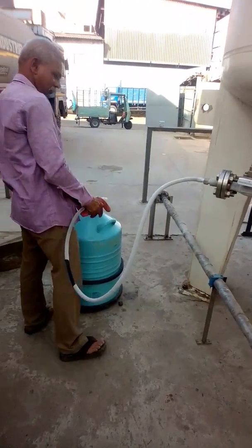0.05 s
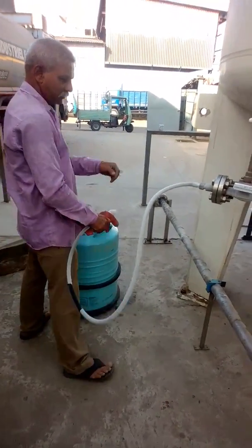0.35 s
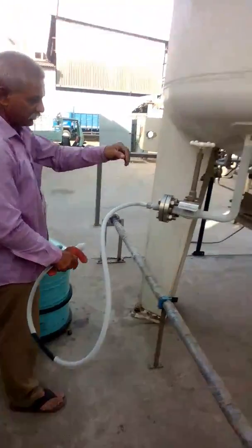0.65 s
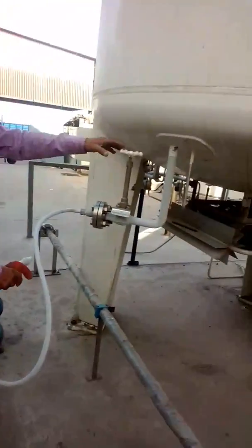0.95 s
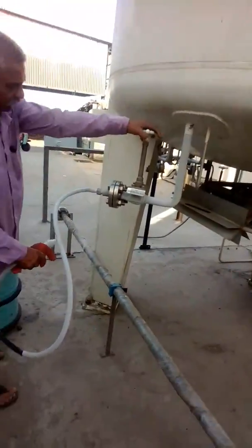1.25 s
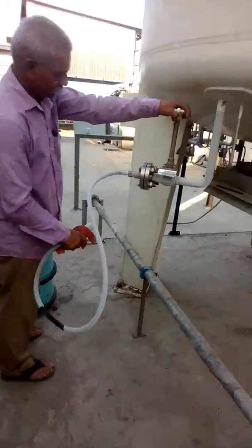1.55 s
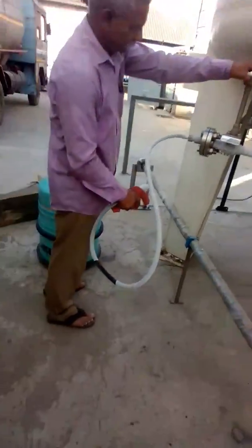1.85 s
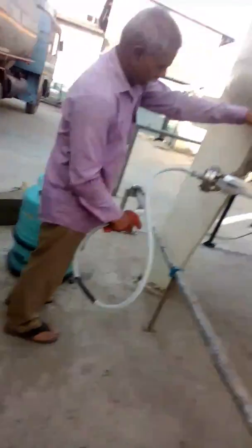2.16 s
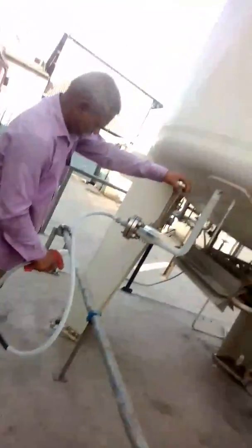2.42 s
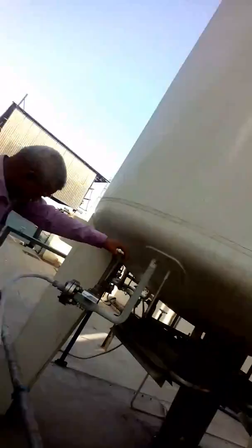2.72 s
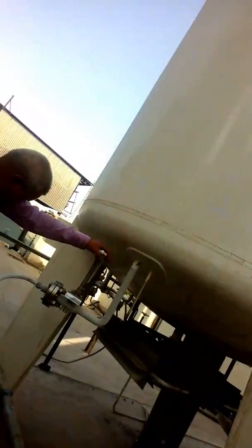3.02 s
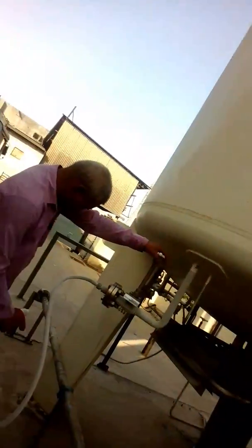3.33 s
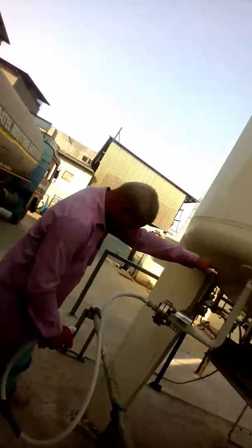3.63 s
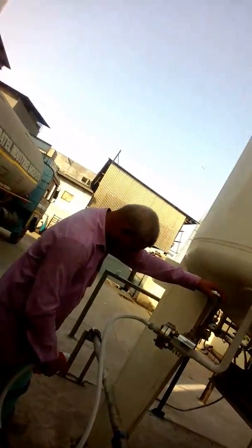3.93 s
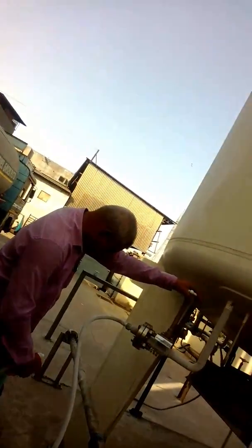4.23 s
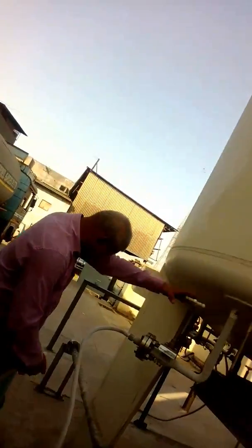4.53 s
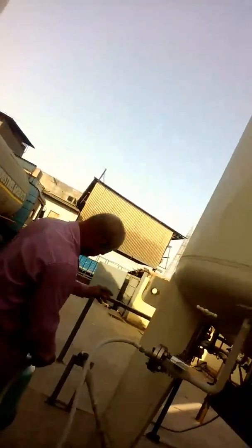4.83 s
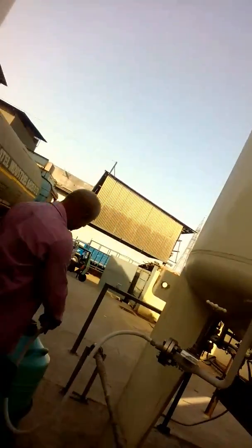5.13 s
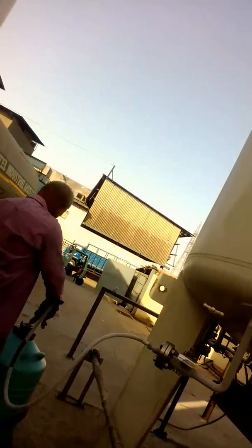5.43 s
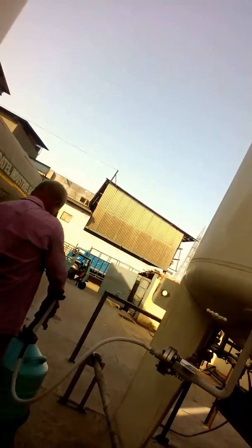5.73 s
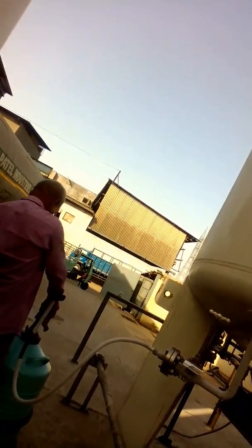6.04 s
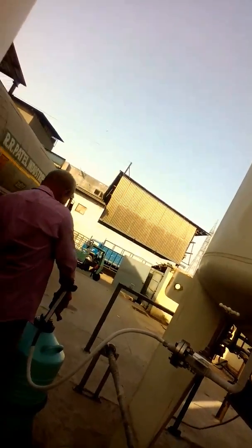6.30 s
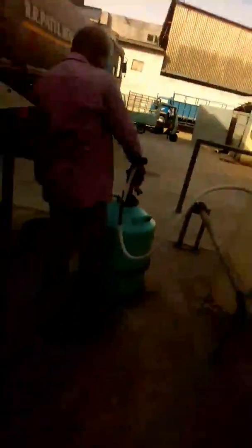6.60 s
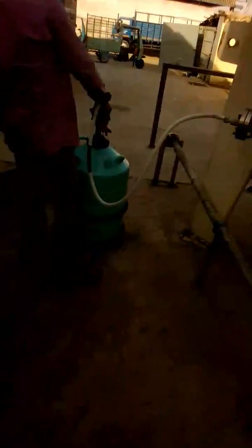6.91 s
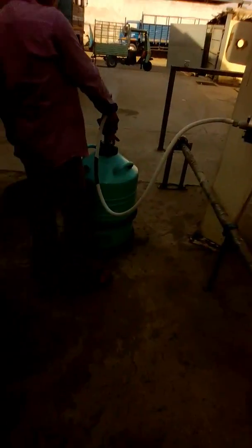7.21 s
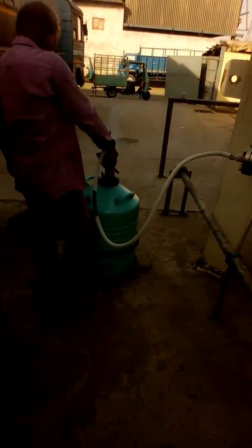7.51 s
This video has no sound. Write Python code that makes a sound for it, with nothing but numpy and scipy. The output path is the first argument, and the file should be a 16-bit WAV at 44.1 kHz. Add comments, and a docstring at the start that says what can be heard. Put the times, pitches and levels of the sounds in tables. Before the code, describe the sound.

Pressurised gas hisses loudly and continuously from a storage tank through a hose in an open yard. Rough, wavering tones ring within the rush, and a thin, very high whistle slowly climbs. After about five seconds the jet reaches the mouth of a flask and howls hollowly. The nozzle goes down the neck with one small dull knock while the hiss carries on, picked up by a hand-held microphone.

```python
"""A jet of cold pressurised gas and liquid hisses from a storage tank through a hose, in an open yard.
Turbulence drives the resonances of the gas path: the jet first hisses into the air as the valve opens,
then the hose rings with rough tones and the valve's thin whistle climbs. Brought to the mouth of a flask,
the jet makes it howl hollowly, and the nozzle goes down the neck with a dull knock.
Ground and tank wall reflect the hiss to a hand-held microphone."""
import sys
import numpy as np
from scipy import signal
from scipy.io import wavfile

SR = 44100
rng = np.random.default_rng(int(sys.argv[2]) if len(sys.argv) > 2 else 0)


def persist_wave(psi):
    """Save psi, clipped to +-1, as 16-bit WAV."""
    counts = np.round(np.clip(psi, -1, 1) * 32767).astype(np.int16)
    wavfile.write(sys.argv[1], SR, np.atleast_2d(counts).T)


N = 342216
FRAME, HOP = 4096, 1024
TIME = np.arange(N) / SR
FRAME_TIMES = np.arange(N // HOP + 2) * HOP / SR
FREQS = np.maximum(np.fft.rfftfreq(FRAME, 1 / SR), 1)

# The mix in each stage (gas, spray, hose flooded, hose ringing, flow settled, flask mouth, flask neck):
# roar_db, rush_db, hiss_db, whistle_db, whistle_breath_db
STAGE_LEVELS = [(-36.5, -19, -11.5, -25, -25), (-34, -21.5, -11.5, -25, -31),
                (-40.5, -21.5, -15.5, -28, -28), (-40.5, -19.5, -14, -28, -30.5),
                (-40.5, -21.5, -14, -27, -30), (-32.5, -15.5, -17, -35, -41),
                (-32.5, -18.5, -15.5, -34.5, -43)]
# Crossfades into each stage after the first, holding their end values: time_s, share (0-1)
FADE_TO_SPRAY = [(1.1, 0.04), (1.5, 1)]
FADE_TO_FLOODED = [(1.95, 0.015), (2.2, 0.55), (2.6, 0.68)]
FADE_TO_RINGING = [(3.25, 0), (3.6, 0.88)]
FADE_TO_SETTLED = [(4.45, 0.032), (4.9, 0.93)]
FADE_TO_MOUTH = [(5.3, 0), (5.45, 0.15), (5.62, 0.26), (5.76, 1)]
FADE_TO_NECK = [(6.52, 0.12), (6.66, 0.44), (6.95, 0.92)]
# The flow spurts or falters: centre_s, length_s, hiss_change_db
SPURTS = [(0.205, 0.041, 1), (0.272, 0.044, -2), (0.37, 0.049, 2), (.52, 0.14, 1.5), (0.661, 0.044, -2),
          (1.008, 0.049, -0.7), (1.1, 0.046, 2.5), (1.356, 0.32, 1.5), (1.98, 0.1, 1.4), (2.902, .12, 0.5),
          (3.29, 0.089, 0.5), (4.47, .1, 0.5), (5.1, .12, 1.5), (6.965, 0.09, 1.5), (7.313, .06, 0.5),
          (7.41, 0.069, 0.5)]
# Last turn of the valve, nozzle swung over, jet grazing the rim, push down the neck:
# start_s, end_s, ramp_s, roar_change_db, rush_change_db, hiss_change_db
HANDLING = [(4.4, 4.78, .1, 1.5, 0, 0.5), (5.24, 5.46, 0.11, -.5, 0, -1.3),
            (5.484, 5.6, 0.068, 4.5, 2.5, -.5), (6.596, 6.966, 0.055, 1, -2, 0.9)]
# The nozzle rests on the flask's mouth: one row, columns as in HANDLING
NOZZLE_SEATED = (6.08, 6.6, .05, 1.7, -2.5, -1.9)

# Broad tone colours of the jet: frequency_hz, relative_level_db
GAS_COLOUR = [(30, -32), (100, -26), (180, -17.5), (300, -5.5), (520, -0.5), (1400, -0.5), (3200, 2.5),
              (5300, 4.5), (6200, 5.5), (7800, 10.5), (11500, 6), (14200, 1.5), (16500, 0)]
SPRAY_COLOUR = [(30, -31), (100, -27), (190, -6.5), (320, 0.5), (650, 0), (1100, 4), (2000, 0), (4900, 3),
                (6500, 8), (9000, 10.5), (10800, 6), (12800, 5), (14200, -1), (16500, 0)]
LIQUID_COLOUR = [(30, -42), (100, -21), (200, -18), (290, -8), (680, -3), (1100, 2.5), (2000, 1.5),
                 (5300, 1), (6500, 5), (8800, 4), (11500, 5), (13900, 3), (14800, -1), (16500, -7)]
FLASK_COLOUR = [(30, -42), (100, -22), (200, -14.5), (330, -2.5), (620, -0.5), (1100, -2), (2200, -2),
                (4500, 0.5), (8700, 0.5), (11000, 3), (12400, -1), (13200, -1), (14400, -3.5), (16500, -19)]
# Resonances of nozzle, hose and flask, by stage: pitch_hz, width_hz, level_over_colour_db
GAS_MODES = [(850, 60, -8), (1860, 560, 4.5), (2480, 210, 6), (3650, 84, 4), (4160, 150, 0),
             (4600, 233, -6), (7200, 810, 1), (9500, 600, 1.5)]
SPRAY_MODES = [(840, 150, 3.5), (2593, 300, -16), (3660, 170, 3.5), (7150, 400, -7), (8900, 800, -3),
               (9700, 300, 2)]
FLOODED_MODES = [(870, 110, 10), (1120, 180, 2.5), (1400, 80, 0), (1600, 130, 4), (2550, 150, 7),
                 (3240, 70, 8.5), (3850, 70, 5), (4300, 120, -2), (6120, 160, -6), (6800, 200, -1),
                 (7270, 300, 7), (8000, 300, 5.5), (8900, 400, -7), (9500, 250, -7), (10250, 250, 1),
                 (10900, 350, 3)]
RINGING_MODES = [(900, 92, 9), (1180, 140, 1.5), (1550, 80, 5.5), (2600, 140, 7), (3300, 160, 3),
                 (3910, 140, 3), (4635, 120, 5), (5230, 200, -2.5), (5800, 140, -1), (6380, 300, 3),
                 (6830, 200, 6), (7200, 80, 7.5), (7590, 250, 7), (9500, 340, 4), (10400, 350, 3),
                 (11000, 330, 5), (12100, 121, -1)]
SETTLED_MODES = [(935, 97, 3), (1200, 330, 3), (1600, 230, 1.5), (2570, 80, 5.5), (3320, 180, 7),
                 (3990, 160, 4), (4700, 200, 1), (5250, 120, 5), (6240, 200, -3), (6960, 170, 5),
                 (7580, 250, 6), (8300, 400, 3.5), (9100, 200, 0), (9620, 200, 5.5), (10440, 360, 6),
                 (11200, 250, 6.5)]
MOUTH_MODES = [(520, 160, 2.5), (748, 33, 13), (857, 42, 16.5), (972, 55, 10), (1104, 19, 19.5),
               (1156, 34, 13), (1213, 77, 9.5), (1465, 73, 9), (1560, 40, 16.5), (1729, 13, 18),
               (1910, 35, 3.5), (2046, 45, 8.5), (2400, 65, 8), (2590, 30, 14.5), (3250, 110, 4),
               (3490, 120, 10.5), (3910, 36, 6), (4140, 200, 1.5), (4390, 70, 3), (4950, 150, 2),
               (7700, 300, -8), (10000, 300, -6)]
NECK_MODES = [(535, 170, 6), (733, 47, 8), (860, 75, 9), (1040, 100, -6), (1675, 44, 9.5), (1887, 52, 7.5),
              (2400, 16, 14), (2504, 23, 11), (2600, 23, 13), (2718, 25, 13), (3110, 39, 8),
              (3410, 120, 8.5), (3643, 62, 4), (3770, 40, 5), (4240, 37, 3), (4700, 61, 3.5),
              (5550, 150, 5.5), (6250, 260, 4.5), (7230, 510, 3.5), (7790, 140, 5), (9300, 200, 1),
              (10320, 200, 3)]
# Antiresonances that hollow out the gas path, by stage: centre_hz, width_hz, gain_db
GAS_NOTCHES = [(770, 140, -8), (5330, 700, -2)]
FLOODED_NOTCHES = [(5400, 1100, -1)]
RINGING_NOTCHES = [(420, 130, -5), (686, 110, -3), (1900, 200, -2.2), (8900, 1500, -0.5)]
SETTLED_NOTCHES = [(1930, 500, -3.5), (745, 110, -8)]
MOUTH_NOTCHES = [(620, 51, -6), (2220, 130, -1)]
NECK_NOTCHES = [(626, 53, -4), (1330, 320, -1.5), (2180, 260, -2)]
# The rim shades the hiss of the seated nozzle: centre_hz, width_hz, gain_db
RIM_NOTCH = [(6200, 3200, -2.5)]
# The jet catches an edge and a band of hiss swells: start_s, end_s, centre_hz, width_hz, gain_db
SQUEALS = [(-.1, .45, 3620, 110, 5), (.66, 1.02, 3640, 110, 7), (.15, .27, 9870, 250, 7),
           (.98, 1.42, 4750, 300, 6), (.29, .62, 7400, 900, 4), (.7, 1.45, 950, 400, 3.5),
           (.8, 1.45, 1600, 200, 2), (1.253, 1.72, 8300, 1200, 3), (1.5, 1.95, 6100, 500, 1),
           (1.89, 2.1, 9400, 1200, 2), (2.14, 2.32, 7700, 900, 2), (2.5, 2.62, 9250, 300, 5),
           (2.7, 2.97, 5900, 700, 4.5), (2.85, 2.98, 7380, 400, 4.5), (3.1, 3.45, 6700, 1000, 3),
           (2.95, 4.15, 14250, 350, 3), (4.6, 5.45, 14480, 300, 5), (3.38, 4.6, 1520, 220, 2),
           (4.45, 4.68, 6200, 400, 5), (4.45, 4.58, 9700, 250, 5), (5.0, 5.17, 10450, 548, 5.5),
           (5.1, 5.26, 7000, 400, 4), (5.75, 6.6, 3430, 330, 2), (6.58, 6.87, 5350, 900, 4.5),
           (6.58, 6.75, 7500, 2600, 2.5), (6.6, 6.8, 3400, 200, 8), (6.72, 6.98, 6150, 350, 3.5),
           (6.898, 7.038, 7870, 420, 10), (6.857, 7.38, 4330, 130, 2), (6.98, 7.42, 3620, 400, 4.5),
           (7.46, 7.72, 4780, 300, 5), (7.35, 7.9, 1920, 450, 4), (7.4, 7.9, 2703, 260, 4.5)]
# The flask's air howls as the jet nears and enters it: start_s, end_s, centre_hz, width_hz, gain_db
HOWLS = [(5.32, 5.62, 940, 150, 5.5), (5.7, 6.2, 360, 110, 4.5), (5.387, 5.678, 1600, 1000, 4.5),
         (5.6, 6.83, 940, 650, 3)]
# Bands thin out as nozzle and microphone move: start_s, end_s, centre_hz, width_hz, gain_db
SHADES = [(-0.1, .35, 950, 550, -3), (-1, .7, 12300, 1100, -1), (0, 0.5, 5700, 900, -2.5),
          (2, 2.2, 1600, 300, -2.5), (1.5, 2.5, 5350, 700, -2), (3, 3.6, 5600, 550, -3.5),
          (4, 3.3, 12700, 900, -2.5), (2.65, 3.9, 9500, 1400, -3), (4.5, 7.3, 8750, 350, -3),
          (4.5, 5.45, 2100, 600, -2.5), (6, 7.2, 2130, 300, -2.5), (6.5, 7.3, 1400, 250, -3.5),
          (6.5, 7.7, 13200, 1400, -2), (6.5, 7.9, 5550, 440, -7), (7.45, 8.6, 3550, 300, -3),
          (7.3, 8.8, 1080, 160, -3)]

# The whistle locks in and swells, or briefly loses its hold: centre_s, length_s, change_db
WHISTLE_SWELLS = [(.35, .12, 4), (.55, .07, 4), (.7, .09, 4), (0.937, .16, -4), (1.41, .06, -9),
                  (1.84, .15, 7), (2.64, 0.19, 6), (3.02, 0.056, -6), (4.14, .08, -4), (4.46, .08, 9),
                  (4.722, .07, 7), (4.864, .05, 5), (5.08, .13, 7), (5.33, .12, 6), (5.74, .07, 6),
                  (6.06, 0.09, 11), (6.22, .08, -5), (6.38, .1, 9), (6.54, 0.036, 7), (6.72, .09, 17),
                  (6.9, .06, 10), (7.13, .14, 11), (7.43, 0.079, 14), (7.66, .14, 8)]
# Second tones beside the whistle: start_s, end_s, offset_hz, level_db
WHISTLE_SIDE_TONES = [(1.823, 2.35, 113, -26), (2.999, 4.35, -115, -31), (3.698, 4.35, 113, -31)]
# The howl locks onto the flask's clearest resonances: start_s, end_s, pitch_hz, level_db
FLASK_NOTES = [(5.68, 6.02, 1561, -22), (6.0, 6.62, 1558, -31.5), (5.7, 6.3, 863, -24.5),
               (5.98, 6.5, 748, -26.5)]
# Rough, wavering tones of valve and hose: start_s, end_s, pitch_hz, roughness_hz, level_db
EDGE_TONES = [(.32, .47, 4150, 50.2, -28), (0.539, .66, 4160, 45, -30), (.71, 1.0, 4100, 55, -27.5),
              (1.05, 1.29, 4110, 55, -29), (2.65, 3.25, 6140, 65, -29.5), (2.95, 3.36, 2545, 45, -31.5),
              (3.237, 3.396, 7220, 50, -23), (3.4, 4.02, 3910, 54.9, -29), (3.75, 4.078, 2590, 69.7, -30.5),
              (3.88, 4.4, 3290, 55, -28.5), (4.4, 4.68, 3340, 49.9, -27.5), (3.98, 4.3, 4100, 45, -32.5),
              (4.119, 4.58, 3910, 35, -34), (5.051, 5.33, 3330, 40, -29), (5.08, 5.29, 4070, 49.8, -33),
              (6.72, 7.04, 5550, 110, -29), (7.18, 7.52, 5620, 100.4, -26.5)]


def jet(roar_top_hz=680, rush_top_hz=5000, level_top_hz=12500):
    """Large, middling and fine eddies roar, rush and hiss in the gas path; liquid slugs add flutter."""
    power = gas_path() * yard_echoes() ** 2
    noise = rng.standard_normal((len(FRAME_TIMES) - 1) * HOP)
    turbulence = signal.stft(noise, nperseg=FRAME, noverlap=FRAME - HOP)[2]
    roar_db, rush_db, hiss_db = flow_levels()
    eddies = [(below(roar_top_hz), roar_db + .65 * wander(12)),
              (below(rush_top_hz) - below(roar_top_hz), rush_db + .59 * wander(20)),
              (1 - below(rush_top_hz), hiss_db + .5 * wander(20))]
    out = 0
    for band, db in eddies:
        # the path sets the colour; the flow sets the loudness below level_top_hz
        band_power = (band ** 2 * below(level_top_hz)) @ power / len(FREQS)
        spectrum = turbulence * band[:, None] * np.sqrt(power / band_power)
        sound = signal.istft(spectrum, nperseg=FRAME, noverlap=FRAME - HOP)[1]
        out = out + undb(db) * sound[:N]
    return out


def flow_levels(rush_share=.29):
    """Levels in dB of roar, rush and hiss: set by the stage, shifted by handling and by spurts."""
    levels = staged(np.array(STAGE_LEVELS)[:, :3, None])
    for start, end, ramp, *shift_db in HANDLING + [NOZZLE_SEATED]:
        levels = levels + np.outer(shift_db, gate(start, end, ramp, TIME))
    spurt_db = sum(db * bell(TIME, at, length) for at, length, db in SPURTS)
    roar_db, rush_db, hiss_db = levels
    return roar_db, rush_db + rush_share * spurt_db, hiss_db + spurt_db


def gas_path(drift=.0042):
    """Power response of nozzle, hose and flask: it morphs by stage, drifts in tune, squeals and howls."""
    stages = [cavity(GAS_COLOUR, GAS_MODES, GAS_NOTCHES),
              cavity(SPRAY_COLOUR, SPRAY_MODES),
              cavity(LIQUID_COLOUR, FLOODED_MODES, FLOODED_NOTCHES),
              cavity(LIQUID_COLOUR, RINGING_MODES, RINGING_NOTCHES),
              cavity(LIQUID_COLOUR, SETTLED_MODES, SETTLED_NOTCHES),
              cavity(FLASK_COLOUR, MOUTH_MODES, MOUTH_NOTCHES, waver_db=1.4),
              cavity(FLASK_COLOUR, NECK_MODES, NECK_NOTCHES)]
    power = staged(stages, FRAME_TIMES)
    tuning = 1 + drift * wander(1.993, FRAME_TIMES)
    retuned = [np.interp(FREQS / stretch, FREQS, frame) for stretch, frame in zip(tuning, power.T)]
    squeal_db = passing_bands(SQUEALS, sputter=.26)
    howl_and_shade_db = passing_bands(HOWLS + SHADES, sputter=0)
    rim_db = notch_db(RIM_NOTCH) * gate(*NOZZLE_SEATED[:3], FRAME_TIMES)
    return np.transpose(retuned) * undb(squeal_db + howl_and_shade_db + rim_db) ** 2


def cavity(colour, modes, notches=(), waver_db=1.5, waver_hz=3):
    """Power response of one stage: steep resonances swell and fade on a broad colour, cut by notches."""
    colour_hz, colour_db = np.transpose(colour)
    broad = undb(np.interp(np.log(FREQS), np.log(colour_hz), colour_db)) ** 2
    centre, width, rise_db = np.transpose(modes)[:, :, None]
    peaks = 1 / (1 + 2 * ((FREQS - centre) / width) ** 2) ** 2
    waver = np.array([wander(waver_hz, FRAME_TIMES) for _ in modes])
    strength = undb(rise_db + waver_db * waver) ** 2
    power = (peaks * broad).T @ strength + broad[:, None]
    return power * undb(notch_db(notches)) ** 2


def notch_db(notches):
    """Gain in dB of a set of antiresonances, as a column over frequency."""
    dips = (db * bell(FREQS, hz, width) for hz, width, db in notches)
    return sum(dips, np.zeros_like(FREQS))[:, None]


def passing_bands(rows, sputter, sputter_hz=7):
    """Gain in dB of boosts and cuts that come and go, each sputtering by a share of its height."""
    humps = [db * bell(FREQS, hz, width) for _, _, hz, width, db in rows]
    swells = [arch(start, end, FRAME_TIMES) * (1 + sputter * wander(sputter_hz, FRAME_TIMES))
              for start, end, *_ in rows]
    return np.transpose(humps) @ np.array(swells)


def valve_whistle(jitter_hz=7, drift_hz=14, waver_db=2, breath_hz=130):
    """An edge tone in the valve: a thin, breathy, wavering line that at times swells or splits."""
    phase = phase_of(whistle_pitch() + drift_hz * wander(2.7) + jitter_hz * wander(38))
    tone_db, breath_db = staged(np.array(STAGE_LEVELS)[:, 3:, None])
    swell_db = sum(db * bell(TIME, at, length) for at, length, db in WHISTLE_SWELLS)
    tone = np.sqrt(2) * np.sin(phase) * undb(tone_db + swell_db + waver_db * wander(10))
    breath = narrow_noise(phase, breath_hz) * undb(breath_db)
    for start, end, offset_hz, db in WHISTLE_SIDE_TONES:
        envelope = arch(start, end, TIME) * undb(db + waver_db * wander(11))
        tone = tone + envelope * np.sin(phase + 2 * np.pi * offset_hz * TIME)
    return tone + breath


def whistle_pitch(start_hz=13090, climb_hz=1230, climb_from_s=1.5, climb_s=2,
                  sag_from_s=6.3, sag_hz_per_s=218):
    """The whistle's pitch in Hz: an S-shaped climb, then a steady sag."""
    climb_age = np.maximum(TIME - climb_from_s, 0)
    climbed = 1 - np.exp(-(climb_age / climb_s) ** 1.5)
    return start_hz + climb_hz * climbed - sag_hz_per_s * np.maximum(TIME - sag_from_s, 0)


def flask_notes(jitter_hz=8, waver_db=2.2):
    """Blown across its mouth, the flask sounds a few firm, slightly wavering notes."""
    out = 0
    for start, end, hz, db in FLASK_NOTES:
        phase = phase_of(hz + jitter_hz * wander(30))
        envelope = arch(start, end, TIME) * undb(db + waver_db * wander(15))
        out = out + np.sqrt(2) * np.sin(phase) * envelope
    return out


def edge_tones(sway_hz=22, flutter_db=1.5, ramp_s=.05):
    """Narrow bands of turbulence in valve and hose cut in abruptly, sway in pitch and flutter."""
    out = np.zeros(N)
    for start, end, hz, rough_hz, db in EDGE_TONES:
        envelope = gate(start, end, ramp_s, TIME)
        sounding = envelope > 0
        at = TIME[sounding]
        phase = phase_of(hz + sway_hz * wander(6, at))
        tone = narrow_noise(phase, rough_hz, at)
        out[sounding] += tone * envelope[sounding] * undb(db + flutter_db * wander(8, at))
    return out


def nozzle_knock(start_s=6.968, pitch_hz=188, decay_s=.0034, drive_db=-20, low_cut_hz=120):
    """One dull, damped knock as the nozzle goes down, on a body too small to give deep bass."""
    age = np.clip(TIME - start_s, 0, 1)
    ring = undb(drive_db) * np.exp(-age / decay_s) * np.sin(2 * np.pi * pitch_hz * age)
    return signal.sosfilt(signal.butter(4, low_cut_hz, "high", fs=SR, output="sos"), ring)


def yard_echoes(ripple_db=1.76, sway_s=.000131, scatter_hz=3500, count=9):
    """Echoes off tank, frame and ground comb the highs; the comb shifts as the microphone sways."""
    comb = 0
    for delay_s in np.geomspace(.0025, .03, count):
        lag_s = delay_s * rng.uniform(.85, 1.15) + sway_s * wander(.6, FRAME_TIMES)
        comb = comb + np.cos(2 * np.pi * np.outer(FREQS, lag_s))
    reflected_share = FREQS / np.hypot(FREQS, scatter_hz)
    return undb(ripple_db * comb * reflected_share[:, None])


def staged(values, at=TIME):
    """Blend one value per stage of the filling, each crossfading over the mix before it."""
    fades = [FADE_TO_SPRAY, FADE_TO_FLOODED, FADE_TO_RINGING,
             FADE_TO_SETTLED, FADE_TO_MOUTH, FADE_TO_NECK]
    out = values[0]
    for fade, value in zip(fades, values[1:]):
        share = np.interp(at, *np.transpose(fade))
        out = out + share * (value - out)
    return out


def narrow_noise(phase, spread_hz, at=TIME):
    """A band of noise reaching about spread_hz to each side of a tone."""
    return wander(spread_hz, at) * np.sin(phase) + wander(spread_hz, at) * np.cos(phase)


def wander(hz, at=TIME):
    """Random modulation of spread near 1 that sways up to about hz times a second."""
    knots = rng.standard_normal(4096)
    return np.sqrt(3 / 2) * np.interp(at * 2 * hz, np.arange(len(knots)), knots)


def phase_of(pitch_hz):
    """Running phase of a moving pitch."""
    return 2 * np.pi * np.cumsum(pitch_hz) / SR


def arch(start, end, at):
    """A rounded swell between two times."""
    progress = np.clip((at - start) / (end - start), 0, 1)
    return np.sqrt(np.abs(np.sin(np.pi * progress)))


def gate(start, end, ramp, at):
    """Open between two times, with straight ramps."""
    return np.clip(np.minimum(at - start, end - at) / ramp + .5, 0, 1)


def bell(x, centre, width):
    """A bell-shaped hump of height one."""
    return np.exp(-2 * ((x - centre) / width) ** 2)


def below(hz):
    """Gain of the low side of a steep crossover."""
    return 1 / (1 + (FREQS / hz) ** 30)


def undb(db):
    """Decibels to gain."""
    return 10 ** (np.asarray(db) / 20)


def scene():
    """The jet in the yard, with its whistle, the flask's notes, rough edge tones and one knock, in mono."""
    return (jet() + valve_whistle() + flask_notes() + edge_tones() + nozzle_knock())[None]


def record(dry):
    """The microphone clips at full scale and cuts the top above 16.9 kHz."""
    high_cut = signal.ellip(10, .1, 70, 16900, fs=SR, output="sos")
    return signal.sosfilt(high_cut, np.clip(dry, -1, 1))


dry = scene()
out = record(dry)
persist_wave(out)
```